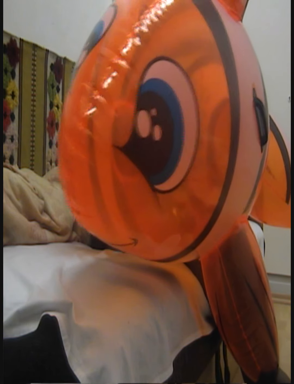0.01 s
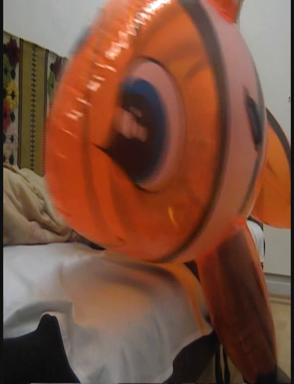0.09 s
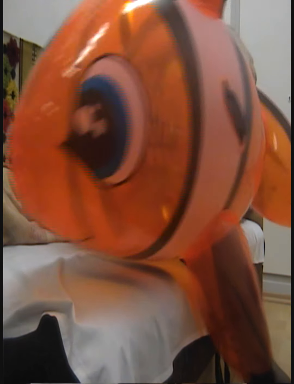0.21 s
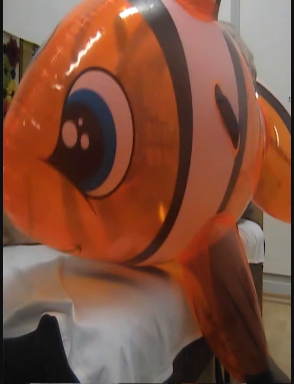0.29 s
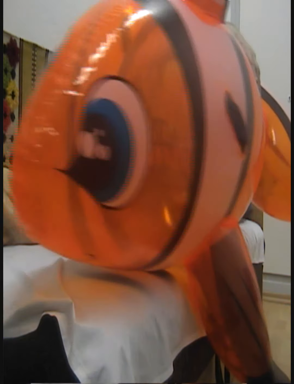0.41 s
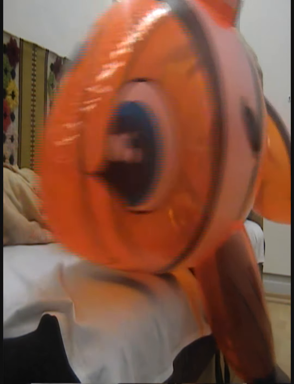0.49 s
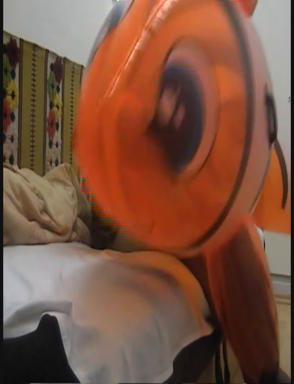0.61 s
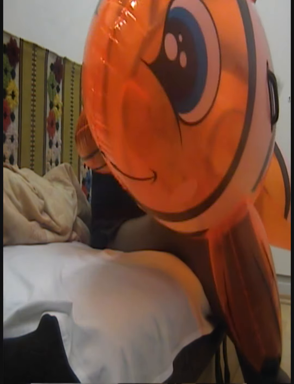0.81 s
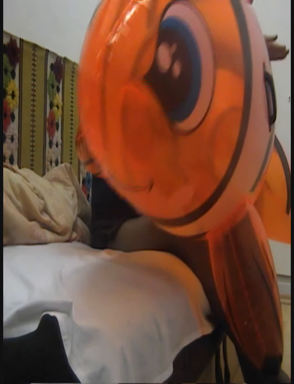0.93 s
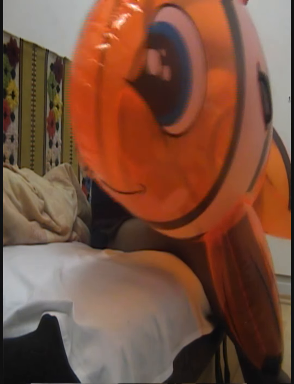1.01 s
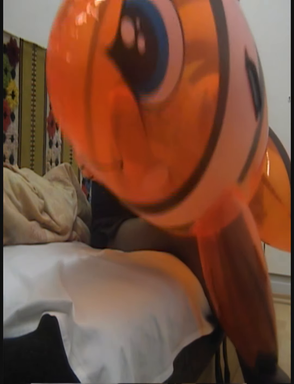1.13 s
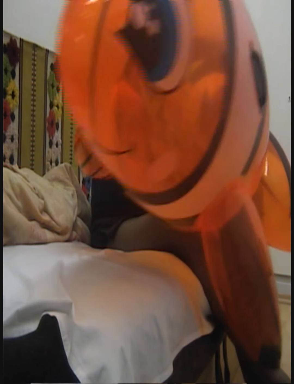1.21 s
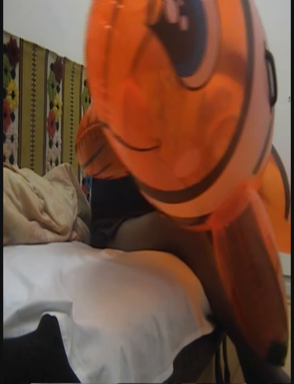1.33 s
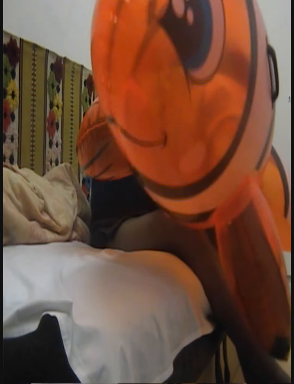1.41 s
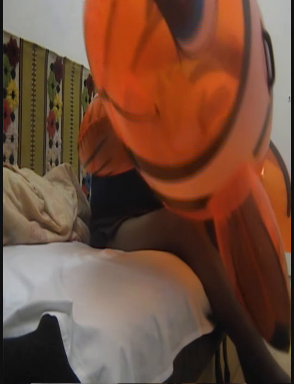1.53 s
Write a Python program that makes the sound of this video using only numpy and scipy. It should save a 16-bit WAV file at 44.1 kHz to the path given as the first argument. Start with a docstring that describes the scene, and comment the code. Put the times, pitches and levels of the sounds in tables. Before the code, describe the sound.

Close to the microphone in a small room, faint taps lead to one loud hollow slap on blown-up vinyl, its ring fades, then stuttering rubs and brushing peak late and die into soft hiss and hum.

```python
"""Small bedroom: a large taut inflated vinyl toy is handled near a camera.
One firm knock and weaker taps: decaying skin partials and a noise crack, then body modes and a room tail.
Rubbing: dense random decaying sine grains (skin slips) that ring the body, under a brushed noise hiss.
Three soft low bumps; quiet floor of coloured noise with mains hum and faint wandering whines."""
import sys
import numpy as np
from scipy import signal
from scipy.fft import rfft, irfft, next_fast_len
from scipy.io import wavfile
from scipy.ndimage import map_coordinates

SR = 44100
rng = np.random.default_rng(int(sys.argv[2]) if len(sys.argv) > 2 else 0)


def file_out(sig):
    """Save sig as 16-bit WAV at sys.argv[1]."""
    # one column per channel
    cols = np.atleast_2d(sig).T
    # limit, then scale
    lim = np.clip(cols, -1, 1)
    pcm = np.round(lim * 32767).astype(np.int16)
    wavfile.write(sys.argv[1], SR, pcm)


N = 68355

# Floor noise colour: f/Hz, density/(dB per Hz, relative)
FLOOR_COLOUR = [(41, -61), (70, -9), (198, -12.5), (334, -12.5), (459, -5), (576, -6), (866, -12),
                (1330, -13), (1460, -11), (2190, -15.5), (12000, -22.5), (15700, -26.5)]
# Floor left-right likeness: f/Hz, correlation/1 (held within -1..1)
FLOOR_LIKENESS = [(60, 0.97), (130, 0.68), (640, 0.72), (1410, -0.79), (3100, -1.16), (6820, -0.11),
                  (15000, -0.27)]
# Hum and blurred whines: f/Hz, level/dB rms, wander/1 (of strength) and rad (of phase)
TONES = [(50.8, -74.5, 0.05), (99.6, -79, .2), (298, -74.5, 0.43), (1488, -72, 0.28), (12200, -95, .7)]
# Soft low bumps: t/s, level/dB (envelope peak), f/Hz
THUMPS = [(0.35, -65, 45.4), (1.178, -58, 61), (1.241, -55.5, 65.4)]
# Room decay: f/Hz, t60/s
ROOM_DECAY = [(100, 0.63), (400, 0.28), (1500, 0.45), (4000, 0.22), (10000, 0.51)]
# Room colour after rubbing: f/Hz, level/dB
RUB_ROOM_COLOUR = [(60, -60), (150, 2.5), (400, -4.5), (1000, -11), (3000, -5), (10000, -41)]
# Tail colour after a knock: f/Hz, level/dB
KNOCK_ROOM_COLOUR = [(60, -5), (100, -12), (170, 11), (260, 8.5), (400, 22.5), (700, 8), (1100, -1.5),
                     (1500, 1), (2500, -6), (4200, 0), (5000, -48), (10000, -13)]
# Modes of skin and enclosed air: f/Hz, level/dB (relative), t60/s (ringing freely)
BODY_MODES = [(97, -0.5, 0.27), (166.6, 1.5, 0.33), (235, -7.5, 0.68), (326.4, 1, 0.59), (377, 0.5, 0.45),
              (431, -2.5, 0.26), (580, 0, 0.29), (687, -4, 0.16), (769, -3.5, 0.18), (1486, 14.5, 0.072)]
# Rubbing strokes, slips: t/s, level/dB (mid-band rms)
STROKES = [(.065, -67.5), (.085, -58.5), (.13, -61), (.2, -63), (.235, -56), (.3, -50.5), (.45, -67.5),
           (.66, -67), (.72, -60.5), (.749, -56.5), (.754, -54), (.82, -64), (.907, -66.5), (.911, -49),
           (.937, -49), (.941, -42), (.97, -47.5), (1.031, -54.5), (1.034, -46.5), (1.11, -50),
           (1.152, -52), (1.163, -38.5), (1.169, -36), (1.19, -29), (1.24, -40), (1.3, -54), (1.4, -65.5),
           (1.55, -71)]
# Brushing hiss: t/s, level/dB (treble-band rms)
BRUSH = [(.155, -80), (.163, -71), (.235, -70.5), (.243, -61), (.33, -64), (.45, -74), (.52, -81),
         (.65, -77.5), (.72, -67), (.8, -71), (.907, -81), (.911, -65), (.962, -55.5), (1.031, -63),
         (1.035, -54), (1.07, -55.5), (1.15, -63), (1.18, -43), (1.22, -50), (1.34, -69), (1.41, -79),
         (1.55, -73.5)]
# Drive from rubbing into the body: t/s, level/dB (re slips)
HOLLOW = [(.99, -20), (1.05, -7), (1.13, -6), (1.165, -22)]
# Slip colour: f/Hz, gain/dB (relative)
SLIP_COLOUR = [(60, -28), (120, -4.5), (200, -6.5), (450, -10), (750, 1.5), (1300, 2), (3400, 0.5),
               (4300, -1.5), (4900, -34), (5600, -38)]
# Hiss colour: f/Hz, density/(dB per Hz, relative)
HISS_COLOUR = [(900, -45), (2500, -6), (4150, -5.5), (4850, -14.5), (5920, -11), (8830, -9.5),
               (13300, -19.5), (14800, -16), (15700, -58)]
# Contacts: t/s, slap level/dB peak, contact brightness f/Hz, ring and room re slap/dB (before their gains)
KNOCKS = [(.0805, -53, 2200, -3), (.1612, -42, 2400, -6), (.2182, -40, 3600, -8), (.2395, -16, 1400, 0),
          (.752, -42, 2800, -4), (.9095, -42, 3600, -6), (.9395, -33, 3600, -8), (.958, -35, 3600, -8),
          (1.0322, -32, 3000, -3), (1.1765, -24, 1900, -13), (1.5488, -34, 1400, 0)]
# First answer of the skin to a palm: f/Hz, level/dB (relative), t60/s (shorter for small contacts)
SLAP_PARTIALS = [(262, -10.5, 0.11), (614, 10.5, 0.013), (1050, -2.5, 0.016), (1908, 3, 0.011)]
# Toy left-right likeness: f/Hz, correlation/1
TOY_LIKENESS = [(60, 0.76), (200, 0.99), (700, 0.99), (1290, 0.95), (2380, 0.77), (4400, 0.55),
                (8120, 0.54), (15000, -0.84)]
# Toy balance: f/Hz, left over right/dB
TOY_BALANCE = [(60, -1), (240, 1), (950, -1), (3770, -4), (15000, 1)]

TOP_HZ = 15850
FLOOR_DB, WANDER_KNOTS_PER_S = -66.5, 50
THUMP_S = .033
ROOM_DELAY_S = .008
RING_RISE_S, RING_ROUGH_RAD = .01, .3
SLIPS_PER_S, SLIP_SPREAD_DB, SLIP_DECAY_CYCLES = 5000, 2, 2
SLIP_HZ, SLIP_SPREAD_OCTAVES, CLUMP_DB = 870, 1.088, 1.5
# bass of the rubbing: changes by this many extra dB per dB of level, neutral at FULL_DB
WEIGHT_HZ, WEIGHT_DB_PER_DB, FULL_DB = 255, .81, -31.5
HELD_SHARE, RUB_ROOM_DB = .35, -4  # share of ring time left under a rubbing hand
PALM_HZ, PALM_BASS_HZ, PALM_RISE_S = 1400, 90, .0015
CRACK_DB, CRACK_T60_S = -6, .012
THUD_DB, RING_DB, KNOCK_ROOM_DB = 7.5, 5, 15.5  # THUD_DB drives both ring and room


def amp(db):
    """dB to gain."""
    return 10 ** (np.asarray(db) / 20)


def unit(x):
    """Scale to rms 1."""
    return x / np.sqrt(np.mean(x ** 2) + 1e-20)


def along(points, hz):
    """Interpolate (Hz, value) points on a log frequency axis."""
    f, v = np.transpose(points)
    return np.interp(np.log(hz + 1), np.log(f + 1), v)


def in_time(points):
    """Interpolate (s, value) points at every sample."""
    return np.interp(np.arange(N) / SR, *np.transpose(points))


def wobble(knots_per_s):
    """Smooth random curve through normal knots."""
    knots = rng.standard_normal(int(N * knots_per_s / SR) + 4)
    return map_coordinates(knots, [np.arange(N) * knots_per_s / SR])


def filtered(x, response):
    """Apply a frequency response by FFT."""
    m = next_fast_len(N + SR // 2)
    return irfft(rfft(x, m) * response(np.fft.rfftfreq(m, 1 / SR)), m)[..., :N]


def after(x, tail):
    """Convolve x with a tail."""
    return signal.fftconvolve(x, tail)[:N]


def band_unit(x, lo_hz, hi_hz):
    """Scale so that one band has rms 1."""
    return x / np.std(filtered(x, lambda f: (f > lo_hz) & (f < hi_hz)))


def stereo(a, b, likeness):
    """Mix unrelated a (mid) and b (side) so that the ports correlate as given per frequency."""
    def weights(hz):
        turn = np.arccos(np.clip(along(likeness, hz), -1, 1)) / 2
        return np.array([np.cos(turn), np.sin(turn)])

    mid, side = filtered(np.array([a, b]), weights)
    return np.array([mid + side, mid - side])


def background():
    """Steady room and microphone noise plus thin tones wandering in phase and strength."""
    a, b = filtered(rng.standard_normal((2, N)), lambda f: amp(along(FLOOR_COLOUR, f)))
    out = amp(FLOOR_DB) * unit(stereo(a, b, FLOOR_LIKENESS))
    t = np.arange(N) / SR
    for hz, db, wander in TONES:
        strength = 1 + wander * wobble(WANDER_KNOTS_PER_S)
        phase = 2 * np.pi * hz * t + wander * wobble(WANDER_KNOTS_PER_S)
        out = out + amp(db) * unit(strength * np.sin(phase))
    return out


def room(colour):
    """Delayed noise tail: each frequency dies at its own speed; energy 1 before colouring."""
    hz, t, z = signal.stft(rng.standard_normal(SR // 2), SR, nperseg=256)
    decay = amp(-60 * t / along(ROOM_DECAY, hz)[:, None])
    tail = signal.istft(z * decay, SR, nperseg=256)[1]
    tail = np.pad(tail / np.linalg.norm(tail), (round(ROOM_DELAY_S * SR), 0))
    return filtered(tail, lambda f: amp(along(colour, f)))[:SR // 2]


def body_ring(time_share=1):
    """Modes of skin and air swell in, waver in phase and die; energy 1."""
    t = np.arange(SR // 2) / SR
    y = np.zeros(len(t))
    for hz, db, t60 in BODY_MODES:
        level_db = db + rng.normal(0, 2) - 60 * t / (time_share * t60)
        phase = 2 * np.pi * (hz * t + rng.random()) + RING_ROUGH_RAD * wobble(30)[:len(t)]
        y += amp(level_db) * np.sin(phase)
    y = y * (1 - np.exp(-t / RING_RISE_S))
    return y / np.linalg.norm(y)


def thumps():
    """Low sines under a swell that peaks after half of THUMP_S, then dies."""
    t = np.arange(N) / SR
    out = np.zeros(N)
    for s, db, hz in THUMPS:
        age = np.maximum(t - s, 0) / THUMP_S
        swell = 2 * age * np.exp(1 - 2 * age)
        out += amp(db) * swell * np.sin(2 * np.pi * hz * (t - s))
    return out


def slips():
    """Stick-slip of the skin: dense grains, each a few decaying cycles of its own pitch."""
    life = np.arange(SR // 100)
    count = int(SLIPS_PER_S * N / SR)
    start = rng.integers(0, N, count)
    size_db = SLIP_SPREAD_DB * rng.exponential(size=count)
    hz = np.clip(SLIP_HZ * 2 ** (SLIP_SPREAD_OCTAVES * rng.standard_normal(count)), 150, 4500)
    cycles = hz[:, None] * life / SR
    fade = np.exp(-cycles / SLIP_DECAY_CYCLES) * np.cos(np.pi / 2 * life / len(life))
    grains = amp(size_db)[:, None] * np.sin(2 * np.pi * cycles) * fade
    train = np.bincount((start[:, None] + life).ravel(), grains.ravel())[:N]
    train = train * amp(CLUMP_DB * wobble(90))
    train = band_unit(filtered(train, lambda f: amp(along(SLIP_COLOUR, f))), 460, 5700)
    level_db = in_time(STROKES)
    bass = filtered(train, lambda f: 1 / (1 + (f / WEIGHT_HZ) ** 4))
    weight = amp(WEIGHT_DB_PER_DB * (level_db - FULL_DB))
    return (train - bass + bass * weight) * amp(level_db)


def brush_hiss():
    """Brushing: coloured noise with a fast random flutter of level."""
    hiss = rng.standard_normal(N) * amp(.65 * wobble(150))
    hiss = band_unit(filtered(hiss, lambda f: amp(along(HISS_COLOUR, f))), 5800, 10260)
    return hiss * amp(in_time(BRUSH))


def rubbing():
    """Slips drive the hand-damped body; hiss lies above; the room answers all."""
    skin = slips()
    ringing = after(skin * amp(in_time(HOLLOW)), body_ring(HELD_SHARE))
    direct = skin + ringing + brush_hiss()
    return direct + amp(RUB_ROOM_DB) * after(direct, room(RUB_ROOM_COLOUR))


def skin_slap(small):
    """First answer of the skin: short partials and a noise crack; small contacts are shorter."""
    t = np.arange(SR // 20) / SR
    skin = amp(CRACK_DB - 60 * t / CRACK_T60_S) * rng.standard_normal(len(t))
    for hz, db, t60 in SLAP_PARTIALS:
        level_db = db + rng.normal(0, 1) - 60 * small * t / t60
        skin += amp(level_db) * np.sin(2 * np.pi * hz * t)
    return skin * (1 - np.exp(-small * t / PALM_RISE_S))


def knocks():
    """Slap, then ringing body and room; fingertips are brighter, shorter, thinner than a palm."""
    out = np.zeros(N)
    for s, db, hz, ring_db in KNOCKS:
        small = hz / PALM_HZ
        bass_hz = PALM_BASS_HZ * small ** 2
        skin = skin_slap(small)
        at = round(s * SR)
        push = np.zeros((2, N + len(skin)))
        push[0, at:at + len(skin)] = skin
        push[1, at] = amp(db + ring_db + THUD_DB)
        # second-order low cut, first-order high cut
        slap, thud = filtered(push[:, :N],
                              lambda f: (1j * f / (bass_hz + 1j * f)) ** 2 / (1 + 1j * f / hz))
        out += amp(db) * slap / np.abs(slap).max()
        out += amp(RING_DB) * after(thud, body_ring())
        out += amp(KNOCK_ROOM_DB) * after(thud, room(KNOCK_ROOM_COLOUR))
    return out


def scene():
    """Toy from two unrelated draws, ports alike in the bass and less so above; bumps in mid only."""
    mid = knocks() + rubbing() + thumps()
    side = knocks() + rubbing()
    pair = stereo(mid, side, TOY_LIKENESS)
    toy = filtered(pair, lambda f: amp(np.outer([.5, -.5], along(TOY_BALANCE, f))))
    return toy + background()


def record(dry):
    """Band limit: nothing passes from TOP_HZ up."""
    return filtered(dry, lambda hz: hz < TOP_HZ)


dry = scene()
out = record(dry)
file_out(out)
```